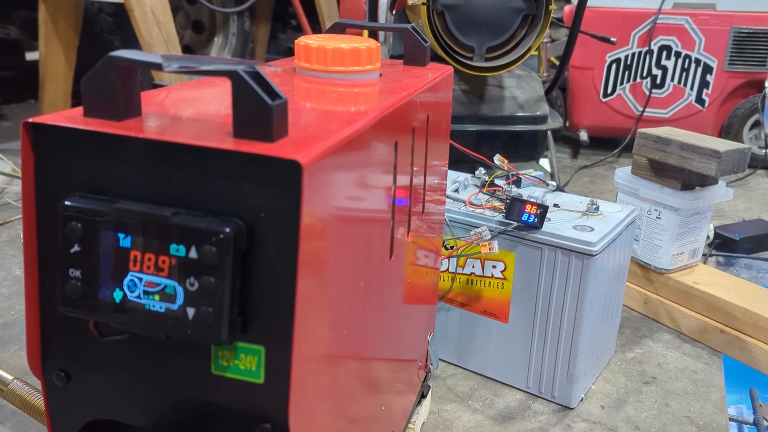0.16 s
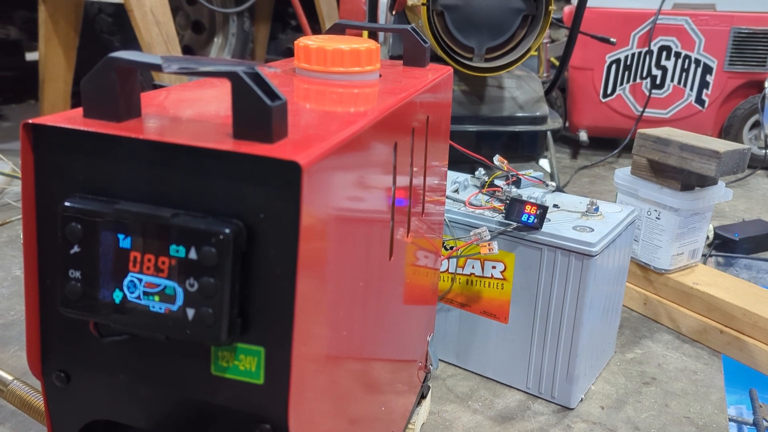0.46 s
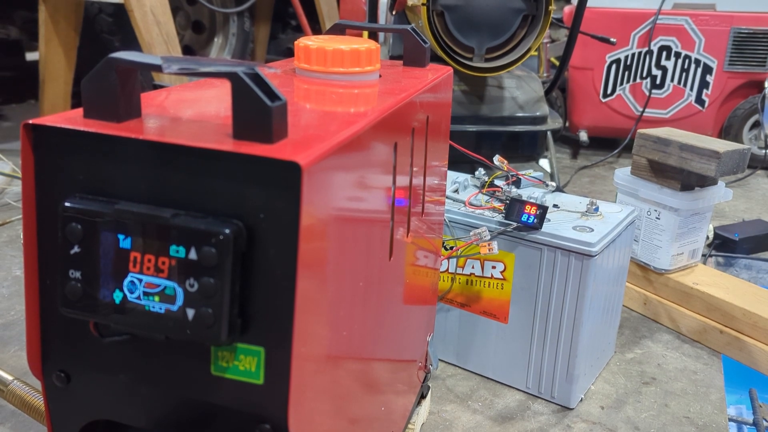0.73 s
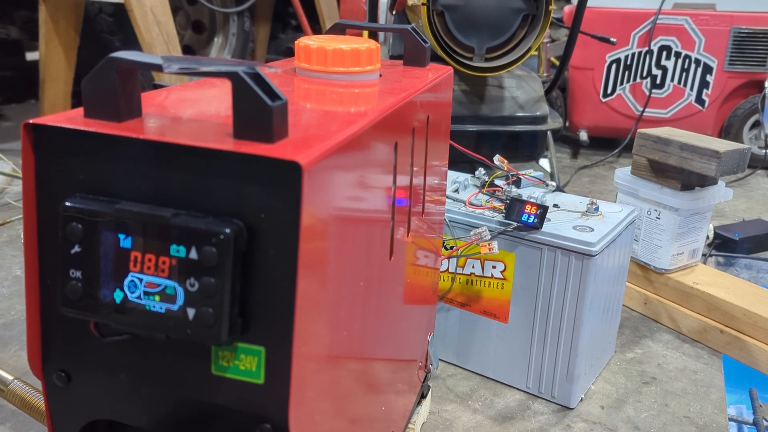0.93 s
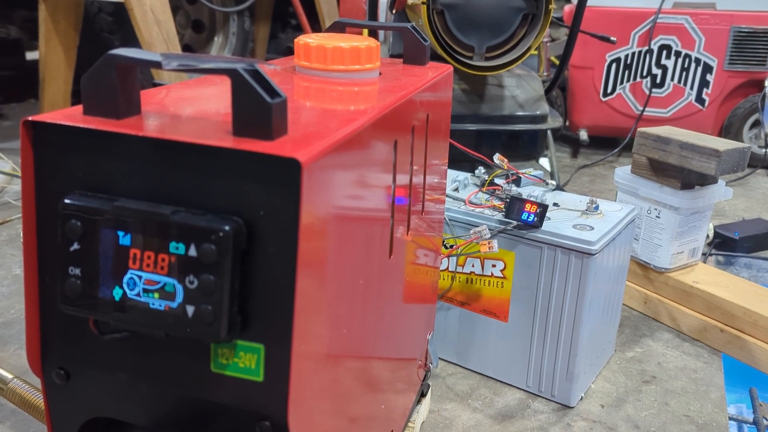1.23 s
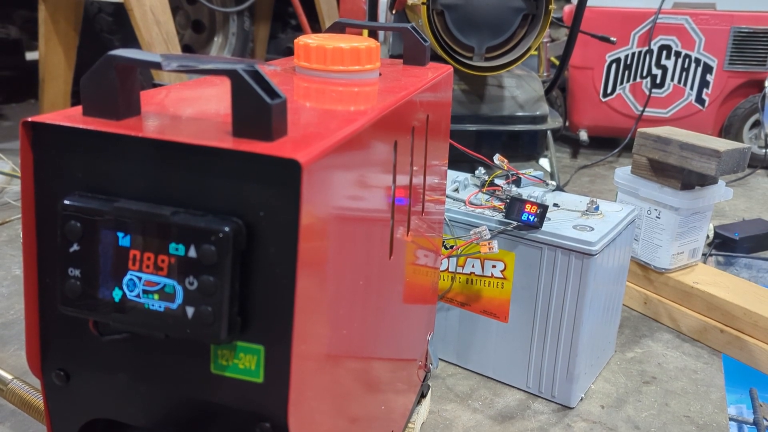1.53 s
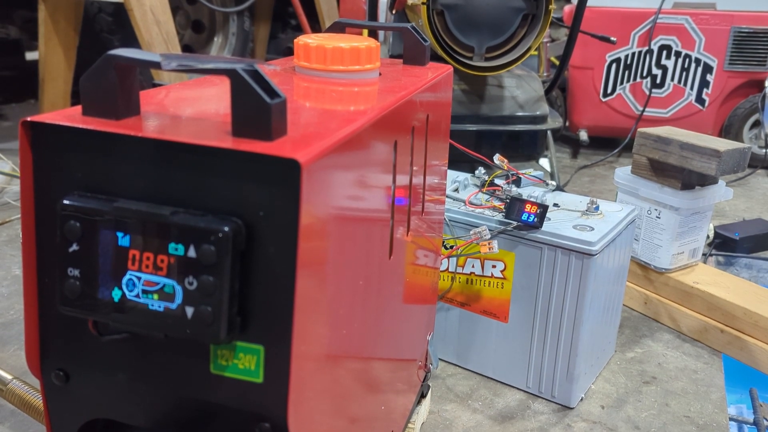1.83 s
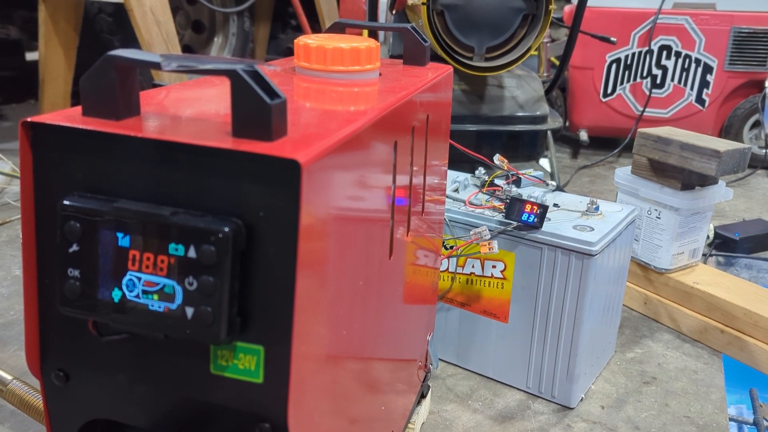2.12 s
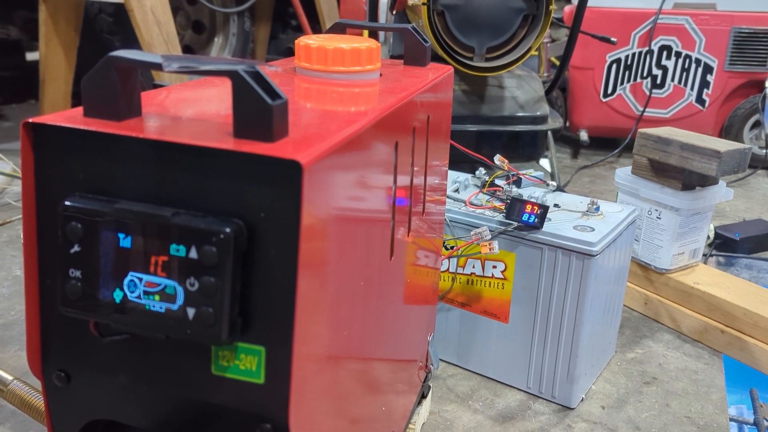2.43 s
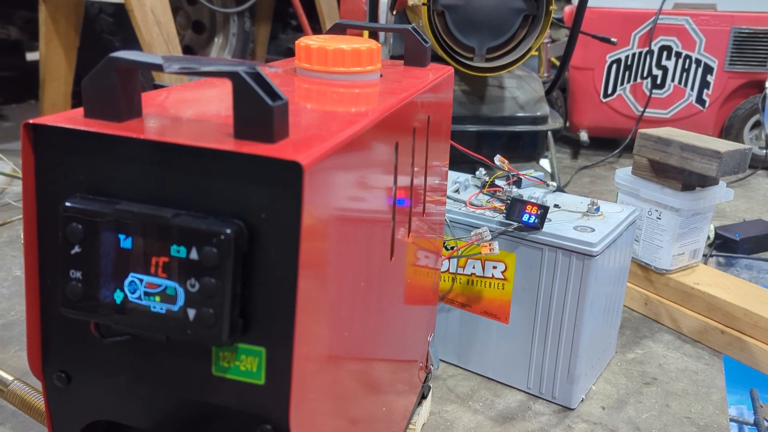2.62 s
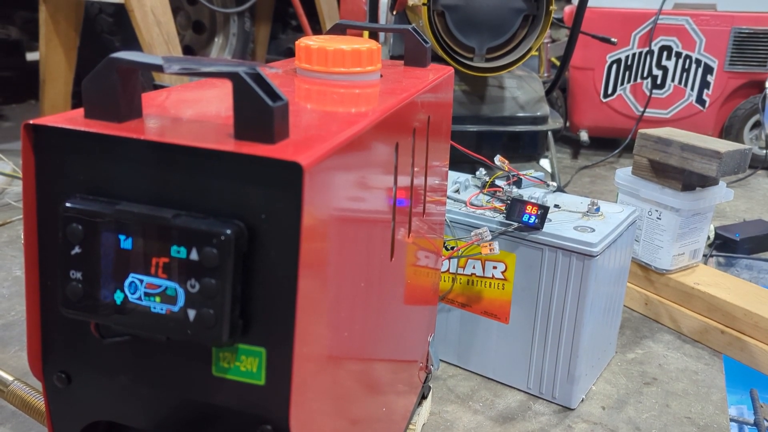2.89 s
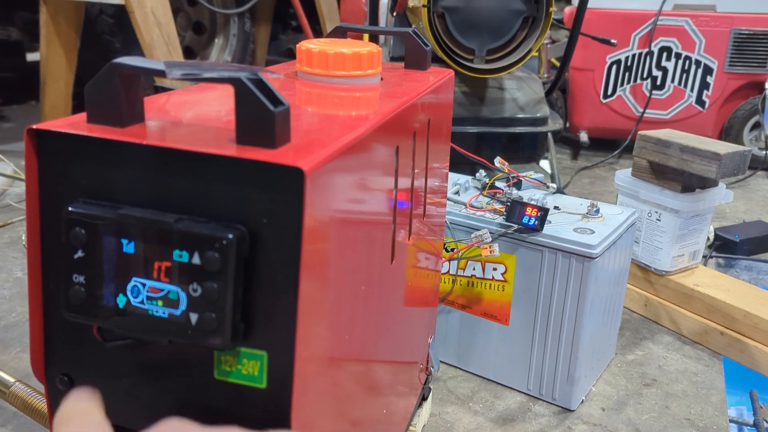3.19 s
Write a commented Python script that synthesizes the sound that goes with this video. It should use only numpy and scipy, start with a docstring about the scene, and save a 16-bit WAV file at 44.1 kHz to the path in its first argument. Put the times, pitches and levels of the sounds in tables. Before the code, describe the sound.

Fuel pump of a small heater clacks about twice a second above a steady low blower hum.

```python
"""In a garage, a small diesel heater runs in a sheet-metal case, with a phone close by.
Its blower roars low as shaped noise with duct resonances; thin sine tones make the motor whine.
The solenoid fuel pump lifts softly, then slams home: each stroke rings decaying pump and case modes
and noisy panel bands. A sleeve, grainy band-passed noise, rustles near the end.
The two phone ports colour the treble differently."""
import sys
import numpy as np
from scipy import signal
from scipy.fft import rfft, irfft
from scipy.io import wavfile
from scipy.ndimage import uniform_filter1d, map_coordinates

SR = 44100
rng = np.random.default_rng(int(sys.argv[2]) if len(sys.argv) > 2 else 0)


def output_pcm(signal):
    """Save a mono or channel-first signal as 16-bit PCM at the path in sys.argv[1].

    Samples are clipped to [-1, 1] before scaling.
    """
    pcm = np.clip(np.atleast_2d(signal).T, -1, 1) * 32767
    wavfile.write(sys.argv[1], SR, np.round(pcm).astype(np.int16))


def gain_from_db(level_db):
    """Convert decibel levels to linear amplitude factors (20 dB per decade)."""
    decades = np.asarray(level_db, float) / 20
    return 10 ** decades


N = 147735
HZ = np.fft.rfftfreq(N, 1 / SR) + 1e-3  # kept above zero for the logarithm in read()


def read(table):
    """Spectral envelope: a table's second column interpolated along log frequency."""
    hz, value = np.array(table, float).T
    return np.interp(np.log(HZ), np.log(hz), value)


def unit(x):
    """Normalization to an rms of 1."""
    return x / np.sqrt(np.mean(x ** 2))


def band(x, hz, width_hz, order=2):
    """Band-pass filtering about a centre frequency."""
    edges = np.clip([hz - width_hz / 2, hz + width_hz / 2], 20, .45 * SR)
    return signal.sosfilt(signal.butter(order, edges, "band", fs=SR, output="sos"), x)


def lowpass(x, top_hz):
    """Gentle second-order low-pass filtering."""
    return signal.sosfilt(signal.butter(2, min(top_hz, .45 * SR), fs=SR, output="sos"), x)


def walk(rate):
    """Slow random modulation: levels held 1 / rate s, smoothed twice, mean 0 and spread 1."""
    hold = int(SR / rate)
    steps = np.repeat(rng.standard_normal(N // 64), hold)[:N + hold]
    smooth = uniform_filter1d(uniform_filter1d(steps, hold), hold)[:N]
    return unit(smooth - smooth.mean())


def correlate(a, b, alike):
    """Partial coherence: sum and difference of two independent noises, alike from 0 to 1."""
    c = np.clip(alike, 0, 1)
    common = np.sqrt((1 + c) / 2) * a
    opposed = np.sqrt((1 - c) / 2) * b
    return common + opposed * np.array([[1], [-1]])


def pair(size, alike):
    """Two white noises of a given mutual correlation."""
    a, b = rng.standard_normal((2, size))
    return correlate(a, b, alike)


# Spectral density of the turbulent air, relative: pitch_hz, level_db
AIR_SPECTRUM = [(15, -78), (25, -47), (48, -12), (97, -5.5), (136, -2.5), (177, -7), (337, -15), (377, -21),
                (492, -19.5), (786, -27.5), (918, -37), (1050, -27.5), (1230, -27), (1530, -39),
                (1960, -36.5), (2140, -40.5), (3600, -40), (4100, -46.5), (5000, -44.5), (5600, -50),
                (7000, -51.5), (9200, -58), (9800, -71.5), (11500, -59), (14800, -73.5), (15600, -100)]
# Duct resonances and dips in the air noise: pitch_hz, width_hz, gain_db
DUCT_RESONANCES = [(62, 19.3, 7.5), (139.3, 53, 3.5), (308, 29, 2.5), (444.4, 62, 7), (489.6, 12, 3.5),
                   (1061, 79, 7.5), (1195, 61, 9), (1370, 50, -1.5), (4130, 120, -4), (4030, 90, 4),
                   (4300, 83, 5.5)]
# Likeness of the air noise at the two ports: pitch_hz, likeness (0-1)
PORT_LIKENESS = [(60, 0.99), (200, 1), (390, 0.77), (720, 0.62), (1300, 0.45), (2500, 0.18), (4600, .05),
                 (12000, 0.076)]
# Slow course of the blower level, relative: time_s, level_db
FLOW_LEVEL = [(0, 0.5), (0.398, -1.5), (0.899, 0), (1.4, -0.5), (1.8, 0.5), (2.299, -0.5), (2.8, 0),
              (3.35, 0)]
AIR_DB = -32.5  # rms level before the slow course
FLICKER_DB, FLICKER_PER_S = 1.32, 12  # spread in each octave, new levels per second


def blower():
    """Turbulence noise filtered by duct resonance; octave bands flicker independently."""
    a, b = rfft(rng.standard_normal((2, N)))
    spectrum = correlate(a, b, read(PORT_LIKENESS))
    duct_db = sum(db / (1 + (2 * (HZ - hz) / width) ** 2) for hz, width, db in DUCT_RESONANCES)
    spectrum = spectrum * gain_from_db(read(AIR_SPECTRUM) + duct_db)
    octave = np.log2(HZ / 32)
    air = 0
    for k in range(-1, 11):
        # neighbouring octave windows overlap and sum to 1
        window = np.cos(np.pi / 2 * np.clip(octave - k, -1, 1)) ** 2
        flicker = gain_from_db(FLICKER_DB * walk(FLICKER_PER_S))
        air = air + flicker * irfft(spectrum * window, N)
    flow_db = np.interp(np.arange(N) / SR, *np.array(FLOW_LEVEL).T)
    return unit(air) * gain_from_db(AIR_DB + flow_db)


# Motor tones, level midway between left and right: pitch_hz, level_db, left_minus_right_db
WHINE_TONES = [(1993, -71, -4.5), (3580, -83.5, 30), (3610, -80.5, 17), (4050, -82, 16), (4210, -87.5, 6),
               (4480, -82, 24.5), (4920, -82, 12.5), (6320, -81.5, 4), (6490, -103, -27),
               (6770, -83.5, -10.5), (8100, -86.5, 10.5)]
WHINE_WOBBLE, WHINE_WAVER_DB = .0025, 2.5  # spread as a share of pitch, spread in level


def whine():
    """Frequency and amplitude modulation: sine tones wobble in pitch and waver in level."""
    out = 0
    for hz, db, pan_db in WHINE_TONES:
        pitch = hz * (1 + WHINE_WOBBLE * walk(30))
        tone = np.sin(2 * np.pi * np.cumsum(pitch) / SR)
        level = gain_from_db(db + WHINE_WAVER_DB * walk(14))
        balance = gain_from_db(np.array([[pan_db], [-pan_db]]) / 2)
        out = out + np.sqrt(2) * tone * level * balance  # sqrt(2) turns rms into peak
    return out


# Ringing modes of pump and case, level relative: pitch_hz, level_db, t60_s, rise_s
RING_MODES = [(505, 8, .055, .003), (587, 1, .09, .003), (700, 0, .06, .002), (824, -7, .05, .001),
              (1145, -4, .05, .0005), (1320, -10, .04, .0005), (1650, -8, .05, .0005),
              (1950, -13, .05, .001), (2300, -14, .1, .001), (2800, -13, .09, .001), (3200, -13, .09, .001),
              (3460, -12, .06, .001), (3920, -1, .045, .0016), (4260, -3, .03, .0016),
              (4460, -6, .025, .0016), (4690, -4, .025, .0016), (4900, -7, .025, .0016),
              (5180, -7, .022, .0016)]
# Dense panel ring, level relative: pitch_hz, width_hz, level_db, t60_s
PANEL_BANDS = [(634, 680, -13, 0.27), (1530, 920, -14.5, 0.16), (3010, 1770, -14, 0.21),
               (4610, 1370, -8, 0.03), (7650, 3100, -20, 0.053), (12500, 4200, -31, 0.02)]
MODE_SCATTER, MODE_SCATTER_DB = .006, 1.5  # stroke-to-stroke spread: share of pitch, level
PANEL_ALIKE, PANEL_FRESH = 0.6, .3  # likeness at the ports, amplitude share new in each stroke
PANEL_RATTLE_DB, PANEL_RATTLE_PER_S = 1, 500  # spread in level, new levels per second
STROKE_SCATTER_DB = 1  # spread in level between contacts
REBOUND_S, REBOUND_DB, REBOUND_TOP_HZ = .0215, -8, 800  # delay, level against the modes, low-pass


def decay(t, t60):
    """Exponential decay, falling 60 dB in t60 seconds (5 ms at least)."""
    return np.exp(-np.log(1000) * t / np.maximum(t60, .005))


def panel_ring(t, panel_db):
    """High modal density: overlapping panel modes heard as decaying, rattling noise bands."""
    rattle = gain_from_db(PANEL_RATTLE_DB * walk(PANEL_RATTLE_PER_S)[:len(t)])
    ring = 0
    for hz, width, db, t60 in PANEL_BANDS:
        noise = unit(band(pair(len(t), PANEL_ALIKE), hz, width, order=3))
        ring = ring + gain_from_db(db + panel_db) * noise * decay(t, t60)
    return rattle * ring


def mode_ring(t):
    """Modal superposition: decaying sines of alternating sign, slightly retuned on every call."""
    mode_hz, mode_db, t60, rise = np.array(RING_MODES).T[:, :, None]
    tune, size = rng.standard_normal((2, len(RING_MODES), 1))
    sign = (-1.) ** np.arange(len(RING_MODES))[:, None]
    level = sign * gain_from_db(mode_db + MODE_SCATTER_DB * size)
    tones = np.sin(2 * np.pi * mode_hz * (1 + MODE_SCATTER * tune) * t)
    onset = 1 - np.exp(-(t / rise) ** 2)
    return (level * tones * decay(t, t60) * onset).sum(axis=0)


def strokes(events, contacts, db, panel_db, top_hz):
    """Impact excitation: each stroke rings the modes, dully rebounds and shakes the panels by contacts."""
    t = np.arange(SR // 4) / SR
    rings = [panel_ring(t, panel_db) for _ in contacts]  # shared by all strokes
    out = np.zeros((2, N + SR))

    def put(start):
        """Superposition in time: the samples a ring occupies."""
        first = int(start * SR)
        return slice(first, first + len(t))

    for start, stroke_db in events:
        modes = mode_ring(t) * gain_from_db(stroke_db + db)
        out[:, put(start)] += modes
        out[:, put(start + REBOUND_S)] += gain_from_db(REBOUND_DB) * lowpass(modes, REBOUND_TOP_HZ)
        fresh = panel_ring(t, panel_db)
        for ring, (delay, contact_db) in zip(rings, contacts):
            shake = np.sqrt(1 - PANEL_FRESH ** 2) * ring + PANEL_FRESH * fresh
            scatter_db = STROKE_SCATTER_DB * rng.standard_normal()
            out[:, put(start + delay)] += shake * gain_from_db(contact_db + scatter_db + stroke_db + db)
    return lowpass(out[:, :N], top_hz)


# Plunger lifts, level relative: start_s, level_db
LIFT_STROKES = [(.351, -37.5), (.7955, -37), (1.2348, -38), (1.666, -38.5), (2.091, -38.5), (2.5095, -37.5),
                (2.9228, -37.5), (3.335, -40)]
# Contacts within a lift, level relative: delay_s, level_db
LIFT_TOUCHES = [(0, 1), (.0020, -2), (.0058, -6)]


def lift():
    """Weak impact: the plunger lifts softly, its ring low-passed to a dull knock."""
    return strokes(LIFT_STROKES, LIFT_TOUCHES, db=-3.5, panel_db=5, top_hz=3400)


# Plunger slams, level relative: start_s, level_db
SLAM_STROKES = [(.4082, -24.5), (.8528, -25), (1.2921, -25), (1.7234, -25), (2.1485, -25), (2.5671, -25),
                (2.9802, -25.5)]
# Contacts within a slam, level relative: delay_s, level_db
SLAM_TOUCHES = [(0, -6), (.0020, 0), (.0045, -2.5), (.0150, -13)]


def slam():
    """Hard impact: the plunger slams home and rings the modes well into the treble."""
    return strokes(SLAM_STROKES, SLAM_TOUCHES, db=-6.5, panel_db=1, top_hz=9400)


# Sleeve rustles, level relative: start_s, length_s, level_db
SLEEVE_RUSTLES = [(3.089, .032, -54), (3.141, 0.052, -55.5), (3.175, 0.037, -57), (3.191, 0.042, -54)]
RUSTLE_HZ, RUSTLE_WIDTH_HZ, RUSTLE_GRAIN_DB = 3500, 1100, 3.5  # centre, width, spread of the grain


def sleeve():
    """Friction noise: band-passed cloth rustle, grainy in level, in half-sine swells."""
    t = np.arange(N) / SR
    swell = 0
    for start, length, db in SLEEVE_RUSTLES:
        swell = swell + gain_from_db(db) * np.sin(np.pi * np.clip((t - start) / length, 0, 1))
    grain = gain_from_db(RUSTLE_GRAIN_DB * walk(300))
    return swell * grain * unit(band(pair(N, 0.36), RUSTLE_HZ, RUSTLE_WIDTH_HZ))


# Balance of the two phone ports: pitch_hz, left_minus_right_db
PORT_BALANCE = [(60, .6), (160, .5), (260, -.5), (450, 1), (1000, .5), (2000, 1), (2700, 10), (5200, 10),
                (5700, -3), (15000, -2)]
LEFT_LAG_S = .00005


def ports(x):
    """Interaural-style level and time differences: ports differ by band, the left hears later."""
    ratio = gain_from_db(read(PORT_BALANCE))
    gains = (2 * ratio / (1 + ratio), 2 / (1 + ratio))  # left and right, their mean 1
    left = map_coordinates(x[0], [np.arange(N) - LEFT_LAG_S * SR], mode="mirror")
    padded = np.pad(np.array([left, x[1]]), ((0, 0), (256, 256)), mode="reflect")
    grid_hz = np.r_[0, HZ[1:-1:200], SR / 2]
    out = []
    for channel, gain in zip(padded, gains):
        taps = signal.firwin2(257, grid_hz, np.r_[gain[0], gain[1:-1:200], gain[-1]], fs=SR)
        out.append(signal.fftconvolve(channel, taps, "same")[256:-256])
    return np.array(out)


def scene():
    """Superposition: blower, pump and sleeve pass the ports; the whine has its own balance."""
    return ports(blower() + lift() + slam() + sleeve()) + whine()


def roll_off(x):
    """The treble ends steeply here."""
    return signal.sosfilt(signal.butter(12, 15350, fs=SR, output="sos"), x)


def record(dry):
    """Reception: the phone takes in the finished two-port mix."""
    return roll_off(dry)


dry = scene()
out = record(dry)
output_pcm(out)
```